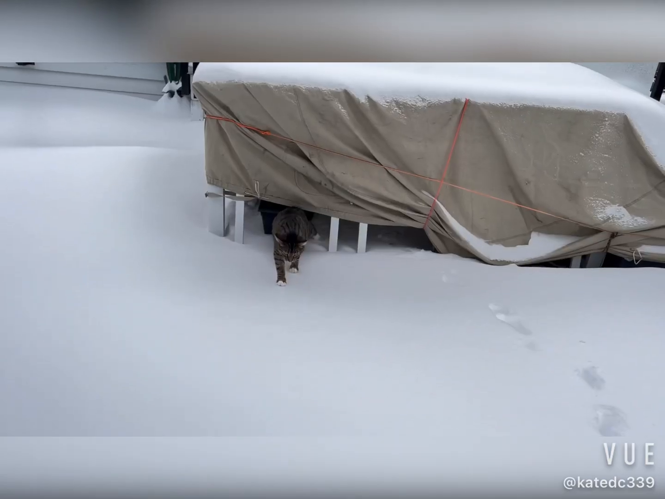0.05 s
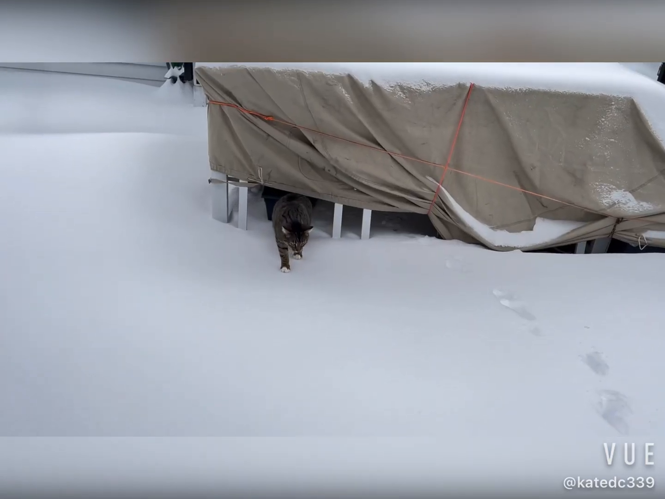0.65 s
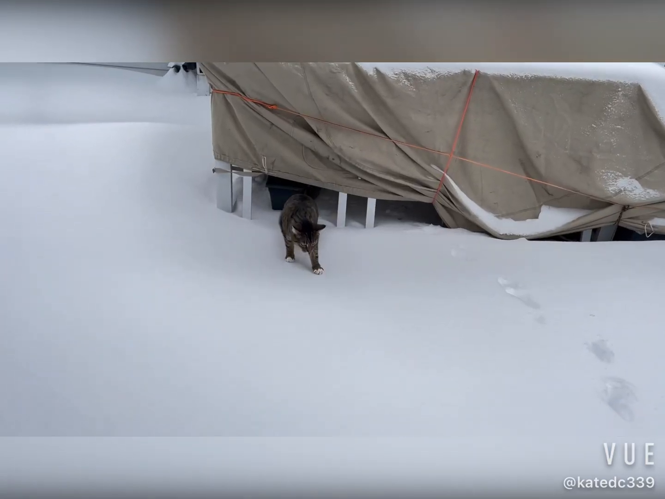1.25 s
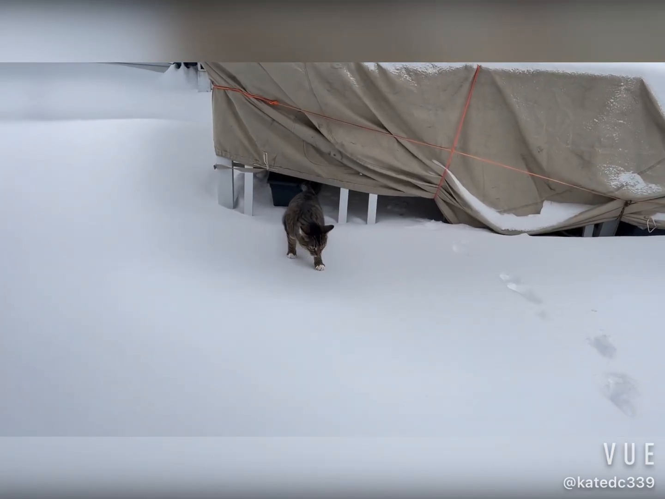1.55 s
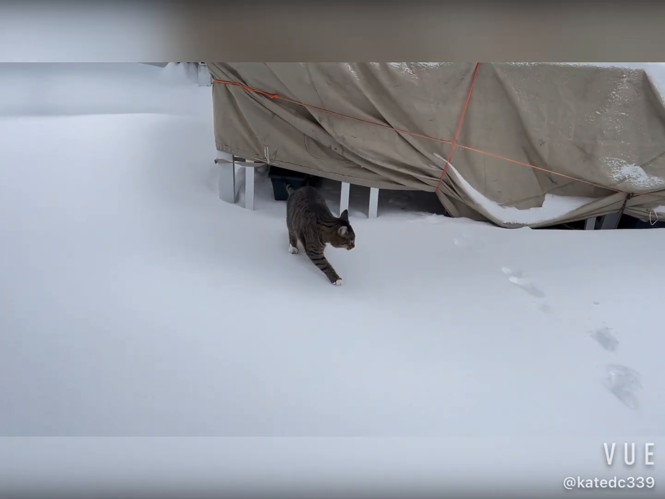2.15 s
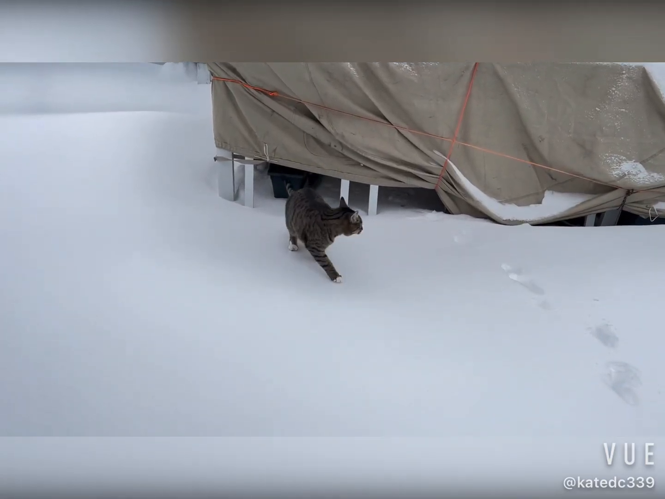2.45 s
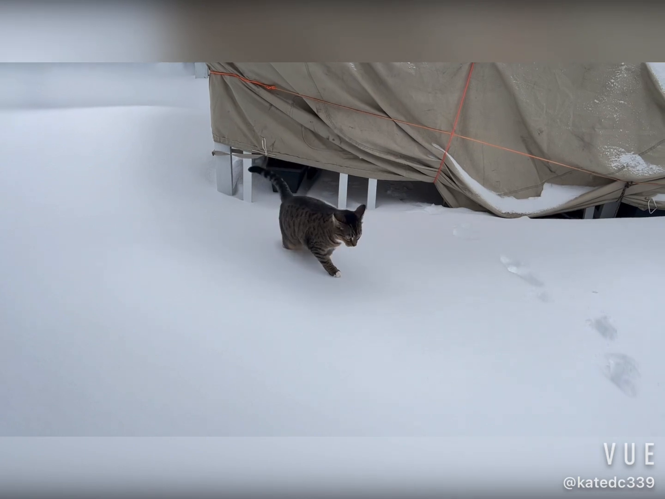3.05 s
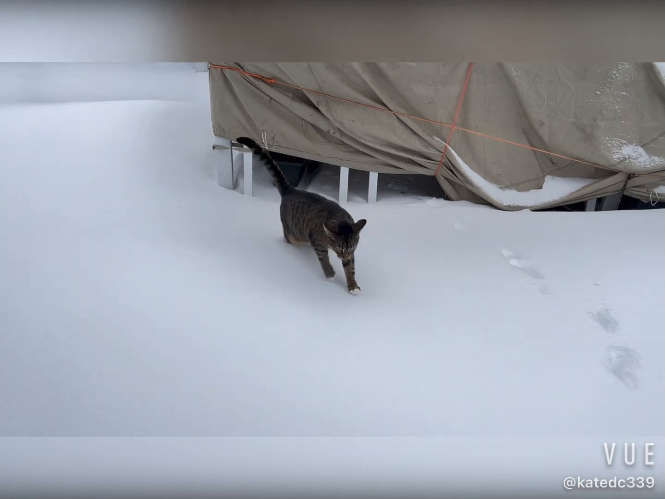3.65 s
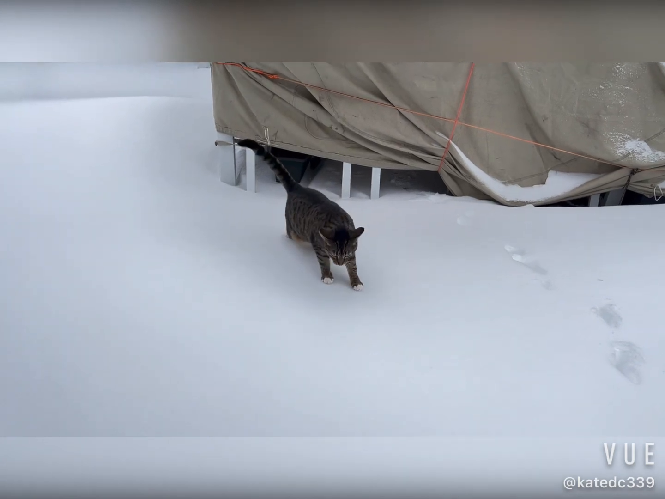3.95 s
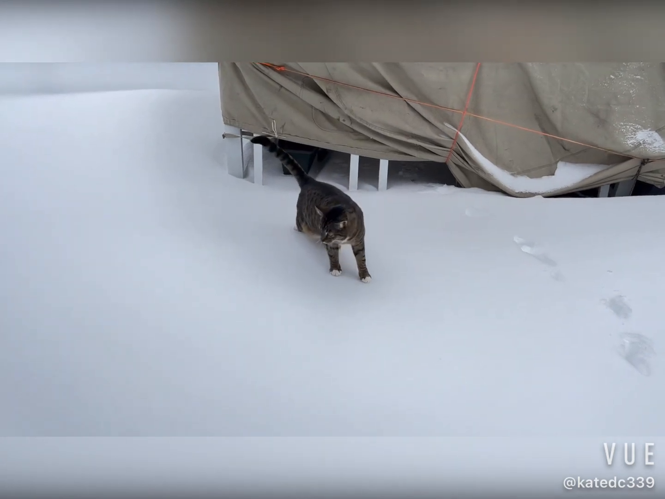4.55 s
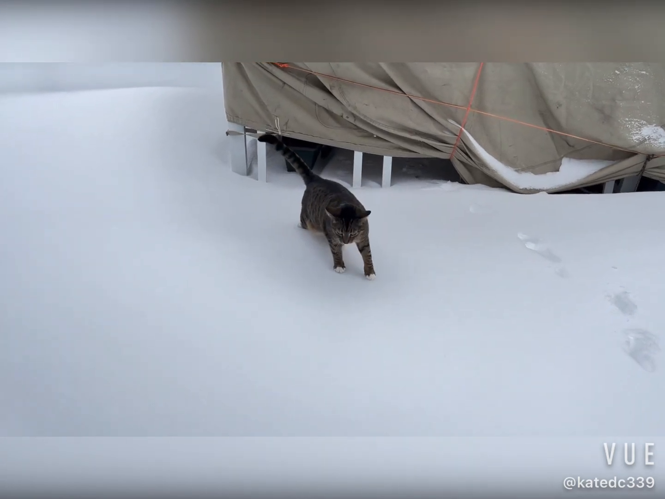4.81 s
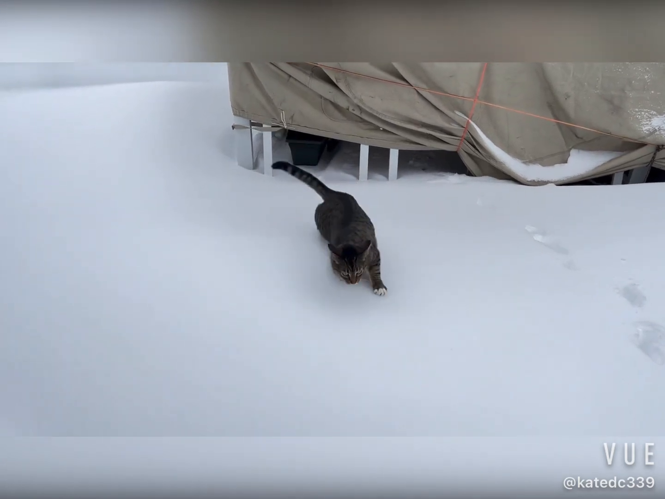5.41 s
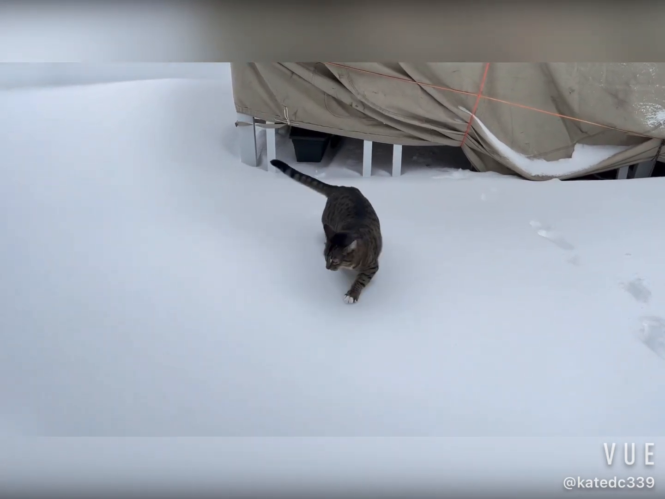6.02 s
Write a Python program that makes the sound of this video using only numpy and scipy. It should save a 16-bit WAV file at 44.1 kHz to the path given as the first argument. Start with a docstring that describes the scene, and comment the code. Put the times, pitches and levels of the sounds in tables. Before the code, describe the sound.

Uneven footsteps crunch and thump through deep, crusted snow, with hissing powder over a low outdoor rumble.

```python
"""A low rumble fills a quiet yard as someone holding a camera takes uneven steps in deep, crusted snow.
Loose snow hisses round the moving boot; the crust snaps by brittle fracture, its grains crumble,
and the boot sinks in with short thumps that fall in pitch. Just before the second step the sole
squeaks by stick-slip friction. Later a sleeve brushes the coat, then the hand shifts its grip and the
icy glint of the steps drops in pitch. At the end the weight settles with a few soft bumps."""
import sys
import numpy as np
from scipy.fft import rfft, irfft, next_fast_len
from scipy.io import wavfile
from scipy.ndimage import map_coordinates

SR = 44100
rng = np.random.default_rng(int(sys.argv[2]) if len(sys.argv) > 2 else 0)


def store_wav(level_fs):
    """Save 16-bit WAV to argv[1]."""
    pcm = np.round(np.clip(np.atleast_2d(level_fs), -1, 1) * 32767)
    wavfile.write(sys.argv[1], SR, pcm.T.astype(np.int16))


N = 276756


def amp(db):
    return 10 ** (np.asarray(db) / 20)


def along(points, hz):
    """Interpolation of (frequency_hz, value) points on a logarithmic frequency axis."""
    frequencies, values = np.transpose(points)
    return np.interp(np.log(hz + 1), np.log(frequencies + 1), values)


def wobble(rate_hz):
    """Random modulation: a smooth curve through rate_hz Gaussian knots a second."""
    knots = rng.standard_normal(int(N * rate_hz / SR) + 4)
    return map_coordinates(knots, [np.arange(N) * rate_hz / SR])


def add(track, start_s, sound):
    """Superposition: a sound adds to the track from start_s on."""
    part = track[round(start_s * SR):][:len(sound)]
    part += sound[:len(part)]


def filtered(x, response):
    """Linear filtering: the spectrum is multiplied by a complex frequency response."""
    size = next_fast_len(N + SR // 2)
    return irfft(rfft(x, size) * response(np.fft.rfftfreq(size, 1 / SR)), size)[..., :N]


def coloured(x, spectrum):
    """Causality: a minimum-phase filter rings only after it is struck."""
    def response(hz):
        cepstrum = irfft(np.log(amp(along(spectrum, hz))))
        folded = np.r_[cepstrum[0], 2 * cepstrum[1:len(cepstrum) // 2]]
        return np.exp(rfft(folded, len(cepstrum)))
    return filtered(x, response)


def stereo_noise(spectrum, coherence, envelope=1):
    """Partial coherence: independent mid and side noises mix into left and right, at unit rms."""
    def response(hz):
        angle = np.arccos(np.clip(along(coherence, hz), -1, 1)) / 2
        return amp(along(spectrum, hz)) * [np.cos(angle), np.sin(angle)]
    mid, side = filtered(rng.standard_normal((2, N)) * envelope, response)
    pair = np.array([mid + side, mid - side])
    return pair / np.sqrt(np.mean(pair ** 2) + 1e-20)


# Course of the low rumble and air, with the rumble swelling under the last step,
# in relative levels: time_s, rumble_db, air_db
RUMBLE_AND_AIR_LEVELS = [(0.0, -50.5, -64.5), (2.55, -51, -61.5), (2.78, -52.5, -58), (3.13, -56, -67),
                         (4.93, -56.5, -69), (5.4, -43.5, -67), (5.65, -53.5, -60), (6.28, -54, -60.5)]
# Spectra of the rumble and of the distant air: frequency_hz, gain_db
RUMBLE_SPECTRUM = [(12, -38.5), (22, -10.5), (57, 3), (112, -0.5), (177, -9.5), (276, -11), (362, -19.5),
                   (409, -16.5), (500, -25), (650, -52.5), (1100, -120)]
AIR_SPECTRUM = [(150, -11.5), (350, 2.5), (700, 4), (1300, 0.5), (2000, -5), (3200, -18), (8000, -23),
                (16000, -38.5)]
# Likeness of left and right in the rumble and air: frequency_hz, coherence
YARD_COHERENCE = [(60, 0.88), (180, 0.58), (550, 0.17), (1650, 0.0088), (4970, 0.21), (15000, 0.25)]

def rumble_and_air(rumble_gain_db=2, air_gain_db=1):
    """Modulated noise: a restless rumble and a rush of distant air, coherent mainly in the bass."""
    times, *levels = np.transpose(RUMBLE_AND_AIR_LEVELS)
    rumble_db, air_db = [np.interp(np.arange(N) / SR, times, level) for level in levels]
    rumble = amp(rumble_db + rumble_gain_db + 1.74 * wobble(9.8))
    rumble = rumble * stereo_noise(RUMBLE_SPECTRUM, YARD_COHERENCE)
    air = amp(air_db + air_gain_db + 0.31 * wobble(0.91)) * stereo_noise(AIR_SPECTRUM, YARD_COHERENCE)
    return rumble + air


# Likeness of left and right close to the walker: frequency_hz, coherence
STEP_COHERENCE = [(300, 0.49), (1000, 0.46), (4000, 1), (8000, 1), (13000, 0.71)]

def grains(spectrum, clump_db, clump_hz):
    """Granular noise: countless tiny impulses merge, and their clumping modulates the amplitude."""
    return stereo_noise(spectrum, STEP_COHERENCE, envelope=amp(clump_db * wobble(clump_hz)))


def swell(peak_s, rise_s, fall_s, peak_db, depth_db=15):
    """Amplitude envelope of a stroke: it gains depth_db over the rise and loses it over the fall."""
    t = np.arange(N) / SR - peak_s
    return amp(peak_db - depth_db * np.maximum(t / fall_s, -t / rise_s) ** 1.3)


# Snow sliding off a boot, in relative levels: peak_s, rise_s, fall_s, hiss_db, sizzle_db
SNOW_SLIDES = [(0.05, .1, 0.09, -77, -58), (0.742, 0.066, 0.15, -60.5, -44.5),
               (0.91, 0.065, 0.1, -57.5, -51), (1.06, 0.023, 0.057, -63.5, -75),
               (1.47, .07, 0.37, -65.5, -87), (1.978, 0.087, 0.27, -71, -80.5),
               (2.62, 0.2, 0.091, -67, -89), (2.79, 0.09, .25, -61.5, -71), (3.3, 0.49, .25, -79, -70.5),
               (3.63, 0.16, 0.3, -67.5, -52), (3.86, 0.084, 0.25, -76.5, -70),
               (4.138, 0.11, 0.36, -80.5, -65), (4.78, 0.23, 0.59, -74, -74), (5.2, 0.061, 0.087, -52, -36),
               (5.38, 0.15, .12, -54.5, -50), (5.728, .4, 0.65, -64, -69), (6.18, 0.53, 0.21, -62, -57.5)]

def powder(sizzle_gain_db=-9):
    """Granular friction: loose snow slides with an uneven hiss and a fine, spiky sizzle."""
    hiss_level = np.linalg.norm([swell(*stroke, db) for *stroke, db, _ in SNOW_SLIDES], axis=0)
    sizzle_level = np.linalg.norm([swell(*stroke, db) for *stroke, _, db in SNOW_SLIDES], axis=0)
    hiss = grains([(500, -35.5), (1500, -0.5), (7000, -3.5), (10000, -9), (13000, -15), (16000, -11)],
                  clump_db=3, clump_hz=1100)
    sizzle = grains([(6000, -37.5), (11000, -7), (16000, -2.5)], clump_db=5.5, clump_hz=250)
    flutter = amp(2.2 * wobble(20))
    return flutter * (hiss_level * hiss + amp(sizzle_gain_db) * sizzle_level * sizzle)


# Breaks in the crust, in relative levels: start_s, crumble_db, crunch_db, snap_db
CRUST_BREAKS = [(0.082, -24, -28, -4.5), (0.292, -55, -72, -39), (0.7492, -22.5, -24, -11),
                (0.819, -47, -41, -51), (0.844, -42.5, -46.5, -27), (0.9042, -21.5, -31, -16),
                (0.915, -27.5, -36, -35), (0.999, -42, -45, -52), (1.864, -26, -27, -14),
                (1.9689, -39, -46, -23.5), (2.0038, -45.5, -52, -15), (2.0575, -51.5, -66.5, -32),
                (2.604, -40, -52, -20.5), (2.670, -43.5, -59.5, -17.5), (2.7036, -26, -32.5, -2.5),
                (2.711, -26, -25, -26), (2.747, -31.5, -32.5, -30), (2.812, -31, -42.5, -15),
                (2.8205, -35, -32, -9), (2.8444, -28, -27, 2.5), (2.949, -46.5, -48, -54),
                (3.0941, -28, -33.5, -16), (3.1703, -33.5, -49, -15), (3.195, -44.5, -49.5, -22),
                (3.439, -58.5, -54, -58), (3.6973, -28.5, -33, -15.5), (4.128, -58, -66, -40.5),
                (4.8747, -40, -61, -33), (5.081, -48, -64, -39), (5.1372, -37.5, -55, -16),
                (5.156, -35, -43, -14), (5.174, -26, -31, -12), (5.187, -23.5, -28, -12),
                (5.21, -28.5, -41, -28), (5.3014, -28.5, -40, -14.5), (5.341, -40, -35, -17.5),
                (5.373, -34.5, -38.5, -20)]
# Spectrum of one snap: frequency_hz, gain_db
SNAP_SPECTRUM = [(200, -39.5), (1200, -15), (4000, -16), (9000, -6.5), (12000, 9), (16000, 6)]

def snaps(delay_s=0.0012, lead_s=0.0033, splinter_s=0.0093):
    """Brittle fracture: the icy crust gives a warning tick, a sharp break and three splinters."""
    ticks = np.zeros(N)
    for start_s, _, _, snap_db in CRUST_BREAKS:
        add(ticks, start_s + delay_s - lead_s, amp([snap_db - 13]))
        add(ticks, start_s + delay_s, amp([snap_db - 2.5]))
        for when, size in rng.random(size=(3, 2)):
            add(ticks, start_s + splinter_s * when, size * amp([snap_db - 11]))
    return coloured(ticks, SNAP_SPECTRUM)


# Spectra of the bright crumbling ice and of the dull crunch below it: frequency_hz, gain_db
CRUMBLE_SPECTRUM = [(300, -44.5), (1200, -4.5), (2000, -3.5), (2800, -8), (5000, -7), (8000, -1.5),
                    (11000, -6), (16000, 0.5)]
CRUNCH_SPECTRUM = [(100, -6.5), (300, 4.5), (600, 1), (850, 0.5), (1200, -5.5), (2000, -12), (3200, -17.5),
                   (7000, -35)]

def crumbling(slips, attack_s=0.00051, crumble_t60_s=0.12, trickle_t60_s=0.32,
              crunch_t60_s=0.073, break_t60_s=0.011):
    """Incoherent addition: showers of breaking grains sum in power. Breaks and slips both crunch."""
    t = np.arange(SR // 2) / SR
    onset = 1 - np.exp(-t / attack_s)
    shower = onset * (amp(-60 * t / crumble_t60_s) + amp(-26 - 60 * t / trickle_t60_s))
    crush = onset * (amp(-60 * t / crunch_t60_s) + amp(2 - 60 * t / break_t60_s))
    crumble_power, crunch_power = np.zeros((2, N))
    for start_s, crumble_db, crunch_db, _ in CRUST_BREAKS:
        add(crumble_power, start_s, (amp(crumble_db - 6) * shower) ** 2)
        add(crunch_power, start_s, (amp(crunch_db - 2) * crush) ** 2)
    for start_s, level_db, _ in slips:
        add(crunch_power, start_s, (amp(level_db - 21) * crush) ** 2)
    crumble = np.sqrt(crumble_power) * grains(CRUMBLE_SPECTRUM, clump_db=1, clump_hz=710)
    crunch = np.sqrt(crunch_power) * grains(CRUNCH_SPECTRUM, clump_db=2.5, clump_hz=440)
    return crumble + crunch


# The boot sinking, in relative levels: start_s, level_db, settling_pitch_hz, length_s
BOOT_SINKS = [(0.0804, -30, 287, 0.0052), (0.289, -39, 117.5, 0.015), (0.7487, -18, 113.5, .009),
              (0.913, -19, 138.6, 0.023), (0.9196, -23.5, 264.4, 0.0082), (0.9483, -20.5, 188.8, .01),
              (1.861, -24, 116.4, .007), (2.598, -37.5, 102, 0.022), (2.7128, -9, 135.4, 0.034),
              (2.7786, -18, 161.4, .008), (2.812, -16, 111.3, .036), (2.9427, -38.5, 81, 0.0091),
              (3.093, -28, 89.6, 0.0062), (3.6968, -34.5, 130.5, 0.0083), (4.874, -34.5, 83.3, 0.017),
              (5.183, -24, 143, .015), (5.1994, -15.5, 94, .035), (5.31, -23.5, 71.5, .06),
              (5.3847, -26, 72, .012)]

def boot_slips(count=5, spacing_s=0.017, scatter_s=0.0018, log_pitch_spread=0.15, loss_db=8.5):
    """Stepwise yielding: a sink is a run of ever weaker slips. Rows: start_s, level_db, pitch_hz."""
    index = np.arange(count)
    age_s = index * spacing_s
    runs = []
    for start_s, level_db, pitch_hz, length_s in BOOT_SINKS:
        late, detune = rng.standard_normal((2, count)) * (index > 0)
        starts = start_s + age_s + scatter_s * late
        levels = level_db - loss_db * (age_s / length_s) ** 2
        pitches = pitch_hz * np.exp(log_pitch_spread * detune)
        runs.append(np.c_[starts, levels, pitches])
    return np.concatenate(runs)


# Cavity resonance of the hole round the boot: frequency_hz, gain_db
HOLE_RESONANCE = [(25, -13), (70, 2), (150, 0), (210, -4.5), (290, 1), (600, -1), (800, 1.5), (1500, -1)]

def thumps(slips, glide_depth=9.62, glide_s=0.003005, attack_s=0.0033, t60_s=0.13,
           roughness=0.36, judder_db=3.5):
    """Dispersion: each slip pushes air through porous snow; low notes come last, so the pitch falls."""
    t = np.arange(SR // 4) / SR
    push, power = np.zeros((2, N))
    for start_s, level_db, pitch_hz in slips:
        falling_hz = pitch_hz * (1 + glide_depth / (1 + t / glide_s) ** 2)
        envelope = amp(level_db - 60 * t / t60_s) * (1 - np.exp(-t / attack_s))
        add(push, start_s, envelope * np.sin(2 * np.pi * np.cumsum(falling_hz) / SR))
        add(power, start_s, envelope ** 2)
    packing = grains([(30, -9), (130, 0), (210, -8), (300, 4.5), (420, -1.5), (600, -10),
                      (1200, -19), (8000, -58)], clump_db=6.5, clump_hz=220)
    air = push * amp(judder_db * wobble(280)) + roughness * np.sqrt(power) * packing
    return coloured(air, HOLE_RESONANCE)


def squeak(start_s=0.639, rise_s=0.05, hold_s=0.048, fall_s=0.02,
           pitch_hz=410, level_db=-44, overtone_db=-16, rough_db=4.5):
    """Stick-slip friction: the sole catches and slides unevenly as weight comes onto packed snow."""
    t = np.arange(N) / SR
    envelope = np.interp(t, np.cumsum([start_s, rise_s, hold_s, fall_s]), [0, 1, 1, 0]) ** 2
    phase = 2 * np.pi * pitch_hz * t + wobble(130)
    tone = np.sin(phase) + amp(overtone_db) * np.sin(2 * phase)
    return envelope * amp(level_db + rough_db * wobble(150)) * tone


# A sleeve brushing the coat: peak_s, rise_s, fall_s, level_db
SLEEVE_STROKES = [(1.7, 0.21, 0.18, -64), (2.31, .05, 0.054, -56.5), (2.35, 0.26, .4, -68)]

def rustle():
    """Sliding friction: cloth on cloth makes a soft band of noise that swells with each stroke."""
    envelope = sum(swell(*stroke) for stroke in SLEEVE_STROKES)
    return envelope * grains([(400, -16.5), (1000, -0.5), (1900, -2.5), (3000, -11.5), (12000, -55)],
                             clump_db=1.5, clump_hz=200)


# The weight settling: peak_s, level_db, pitch_hz
SETTLING_BUMPS = [(5.495, -34, 91), (5.567, -35, 65.5), (5.629, -35, 59), (5.802, -36.5, 56.7),
                  (5.912, -43, 88), (6.073, -32.5, 67.4)]

def bumps(width_s=0.014):
    """Compaction: deep snow packs down in dull Gaussian pulses of a cycle or two."""
    t = np.arange(-SR // 20, SR // 20) / SR
    envelope = np.exp(-(t / width_s) ** 2)
    track = np.zeros(N)
    for peak_s, level_db, pitch_hz in SETTLING_BUMPS:
        add(track, peak_s + t[0], amp(level_db) * envelope * np.cos(2 * np.pi * pitch_hz * t))
    return track


# Bright treble colour of the steps, near 15 kHz early and 13 kHz later: frequency_hz, gain_db
EARLY_TREBLE_COLOUR = [(9000, 1), (12500, 5), (13600, -12), (14600, 14.5), (15500, 14.5), (16200, -2.5)]
LATE_TREBLE_COLOUR = [(10300, 1), (11700, 13), (13200, 11), (14500, 4.5), (15700, -3), (16200, -21)]
# Phase difference of the microphone ports in each grip: frequency_hz, left_minus_right_rad
FIRST_GRIP_PHASE = [(400, 0.36), (650, 2.4), (900, 2), (1500, 0.5), (4000, 1.28), (9000, 1.5), (12300, -4),
                    (14700, -5), (15600, -4)]
LATER_GRIP_PHASE = [(300, 0.4), (800, -1), (1500, 1.5), (5500, 1.46), (7500, 1), (10000, 10), (11700, -5),
                    (13200, -7.5), (15600, -6.5)]
# Level difference of the ports, the left one facing the feet: frequency_hz, left_minus_right_db
PORT_BALANCE = [(100, -3), (300, -1), (1000, 3), (2500, 2), (5000, 9.5), (7000, 12.5), (9500, 4.5),
                (12000, -0.5), (16000, 0)]

def stereo_image(steps, treble_colour, phase):
    """Interchannel differences: the brightened steps differ left and right in level and phase."""
    sides = np.array([[0.5], [-0.5]])
    def response(hz):
        return amp(sides * along(PORT_BALANCE, hz)) * np.exp(1j * sides * along(phase, hz))
    return filtered(coloured(steps, treble_colour), response)


def scene(grip_shift_s=2.93):
    """Superposition: the close steps add to the rumble and air."""
    slips = boot_slips()
    steps = snaps() + crumbling(slips) + thumps(slips) + bumps() + powder() + squeak() + rustle()
    early = stereo_image(steps, EARLY_TREBLE_COLOUR, FIRST_GRIP_PHASE)
    late = stereo_image(steps, LATE_TREBLE_COLOUR, LATER_GRIP_PHASE)
    return np.where(np.arange(N) / SR < grip_shift_s, early, late) + rumble_and_air()


def record(dry):
    """Band limiting: the camera's steep low-pass filter removes the highest treble."""
    cutoff_hz = 16200
    return filtered(dry, lambda hz: 1 / np.sqrt(1 + (hz / cutoff_hz) ** 120))


dry = scene()
out = record(dry)
store_wav(out)
```